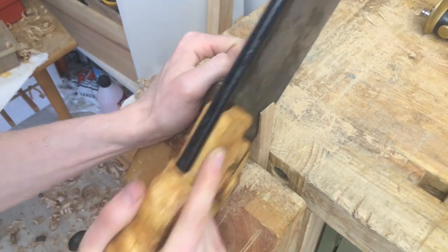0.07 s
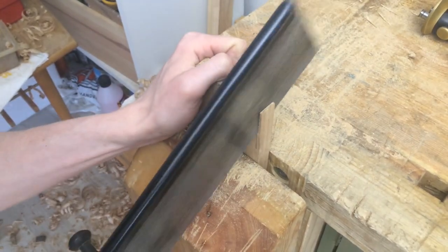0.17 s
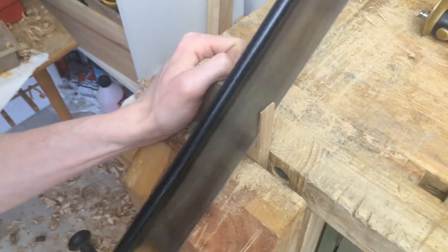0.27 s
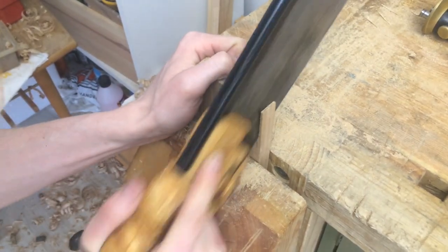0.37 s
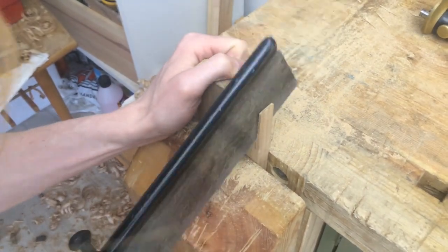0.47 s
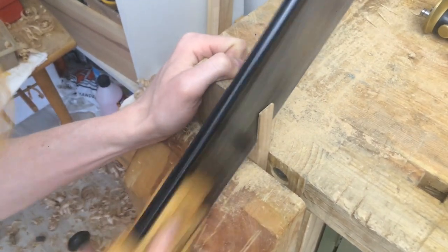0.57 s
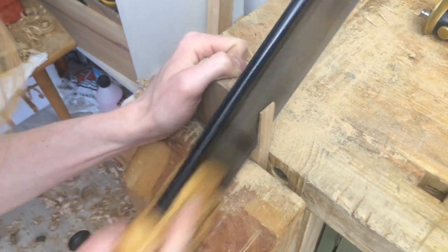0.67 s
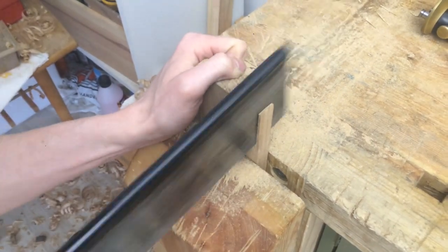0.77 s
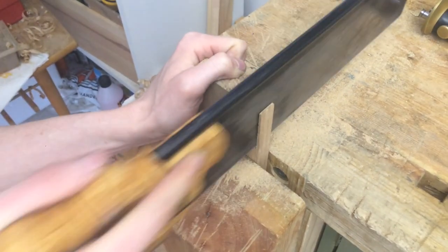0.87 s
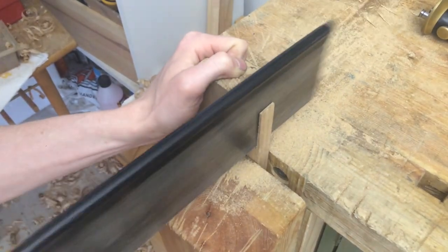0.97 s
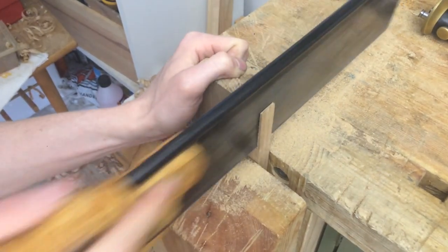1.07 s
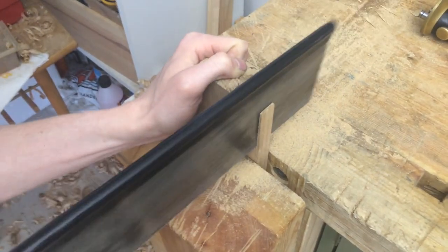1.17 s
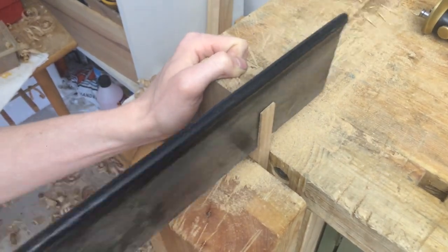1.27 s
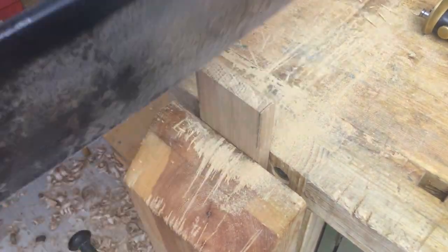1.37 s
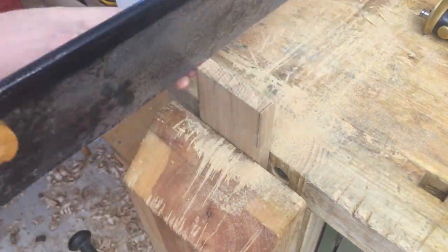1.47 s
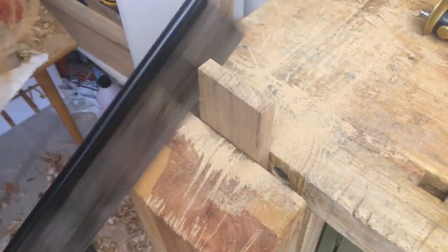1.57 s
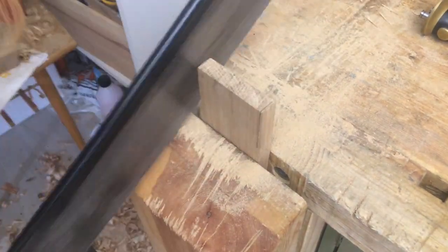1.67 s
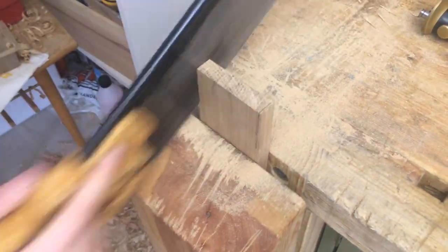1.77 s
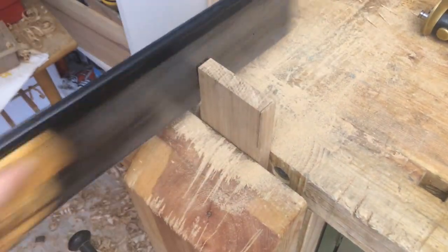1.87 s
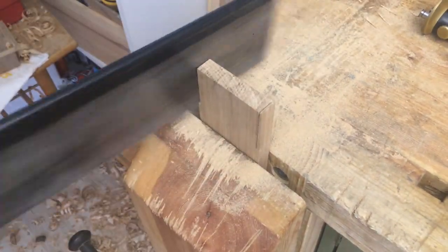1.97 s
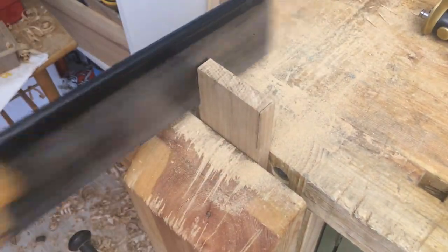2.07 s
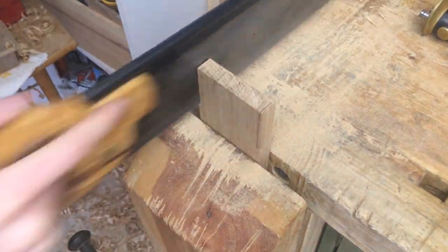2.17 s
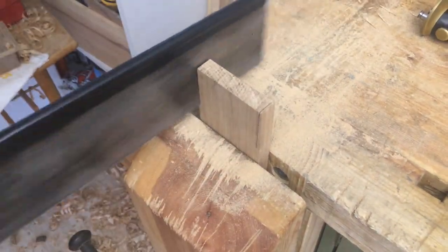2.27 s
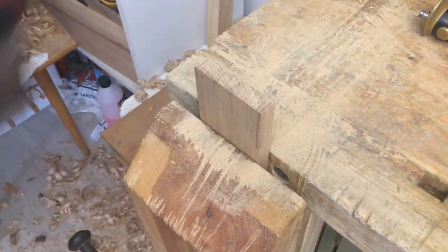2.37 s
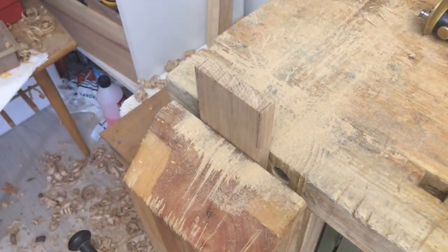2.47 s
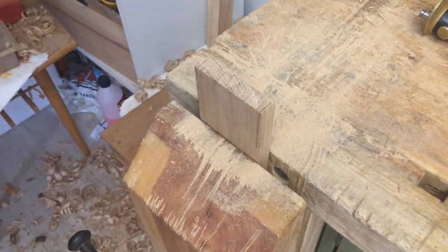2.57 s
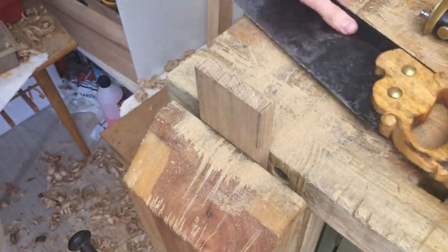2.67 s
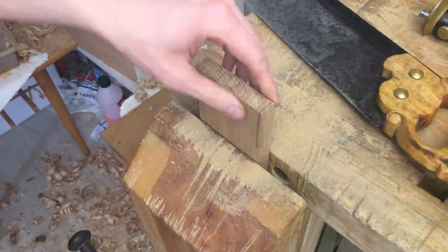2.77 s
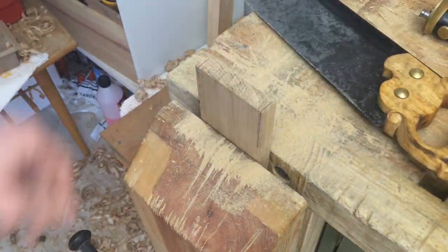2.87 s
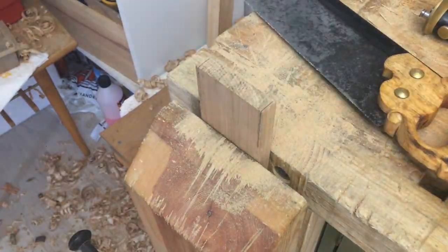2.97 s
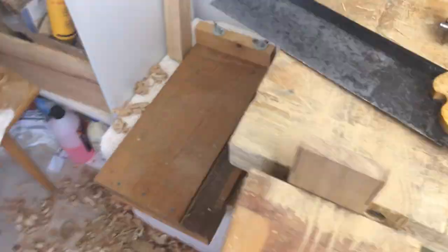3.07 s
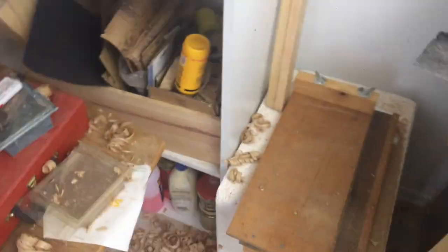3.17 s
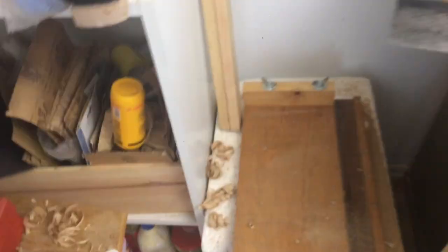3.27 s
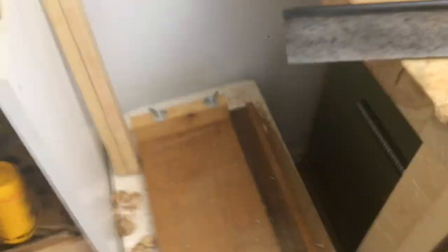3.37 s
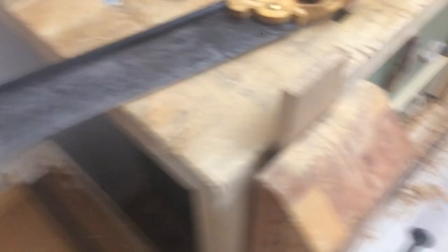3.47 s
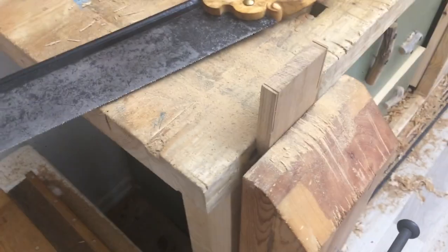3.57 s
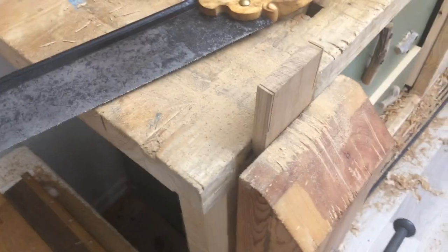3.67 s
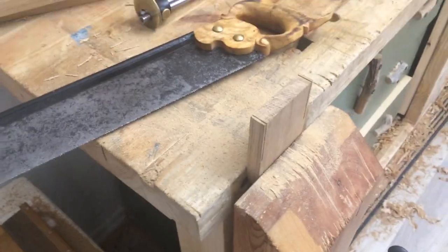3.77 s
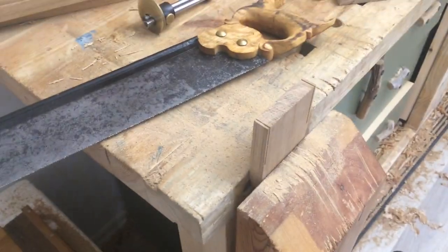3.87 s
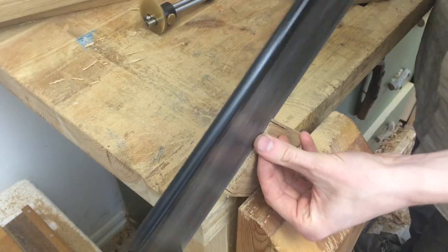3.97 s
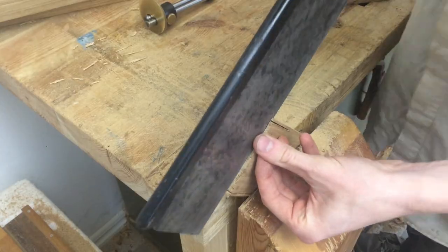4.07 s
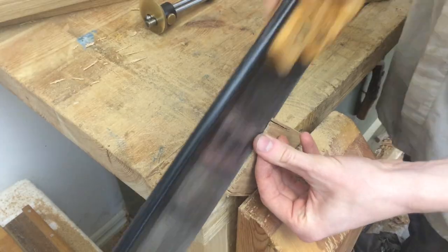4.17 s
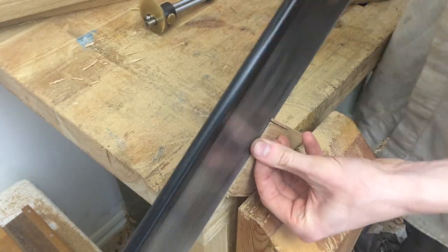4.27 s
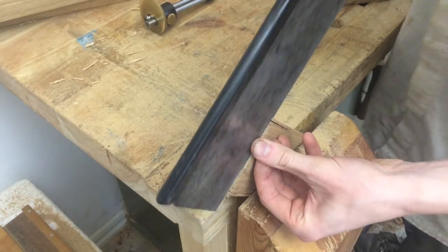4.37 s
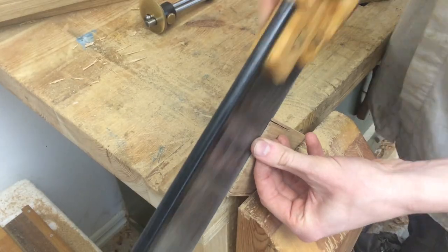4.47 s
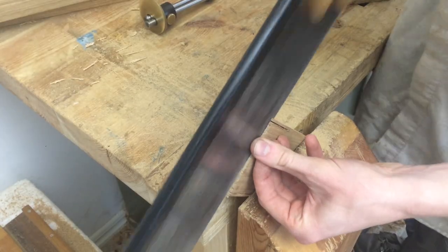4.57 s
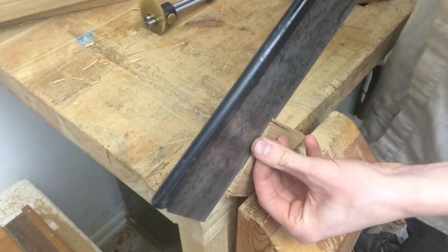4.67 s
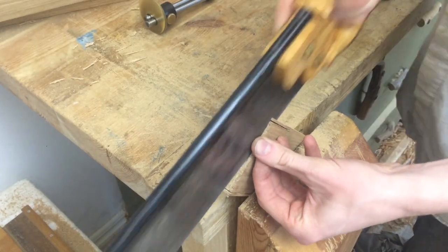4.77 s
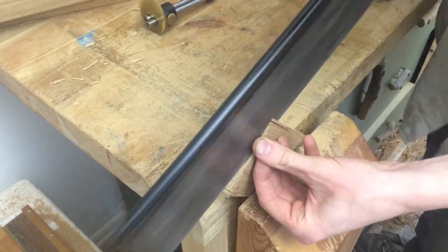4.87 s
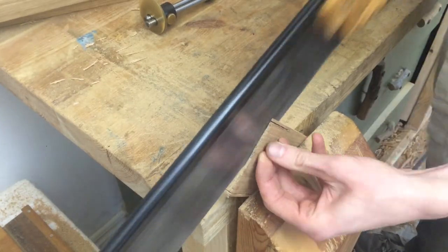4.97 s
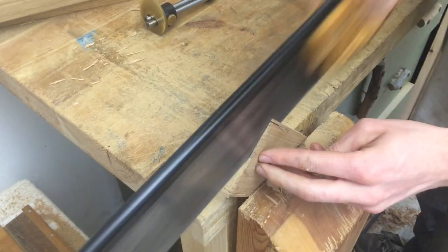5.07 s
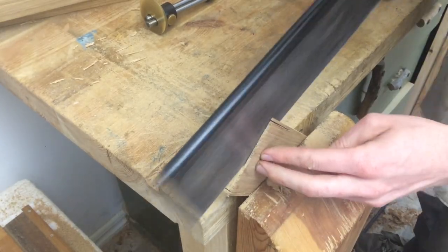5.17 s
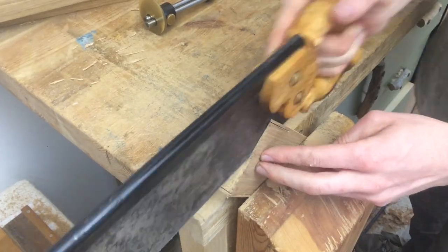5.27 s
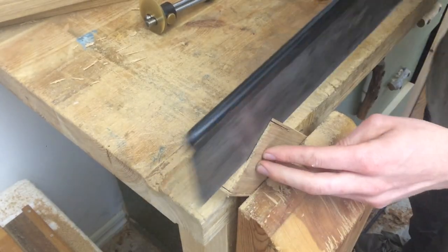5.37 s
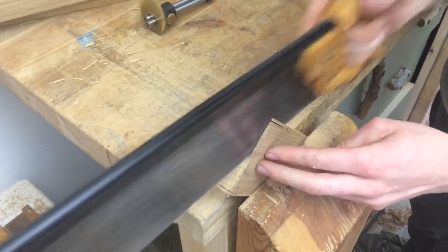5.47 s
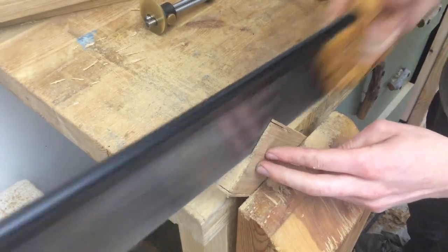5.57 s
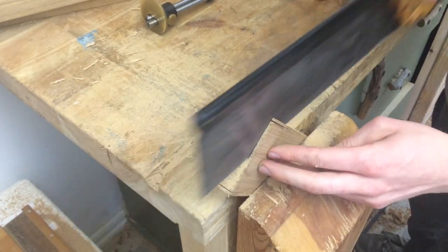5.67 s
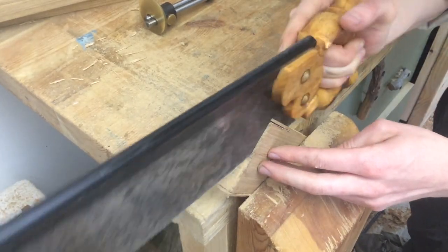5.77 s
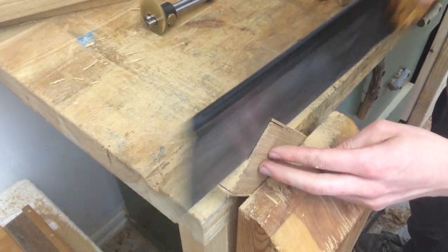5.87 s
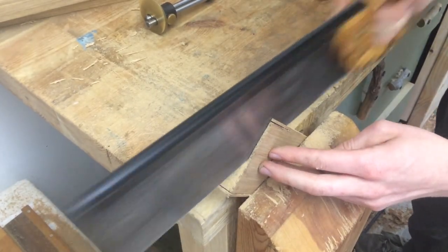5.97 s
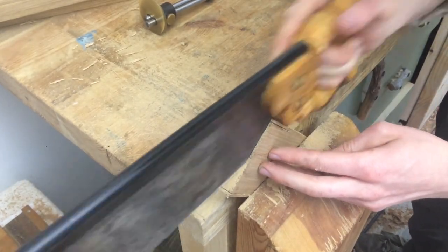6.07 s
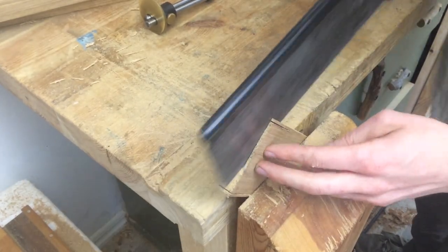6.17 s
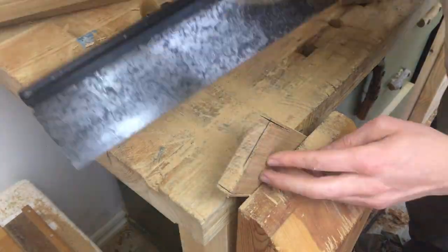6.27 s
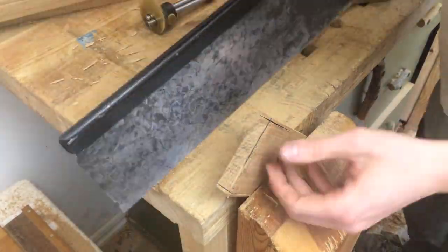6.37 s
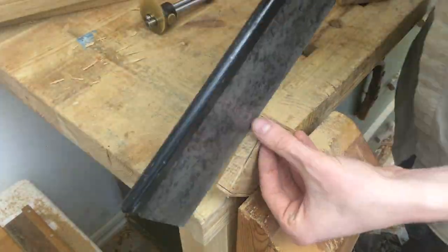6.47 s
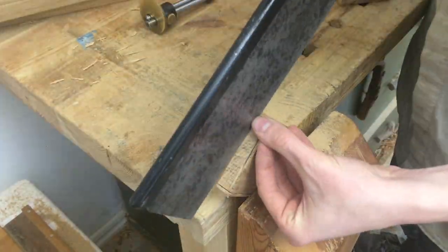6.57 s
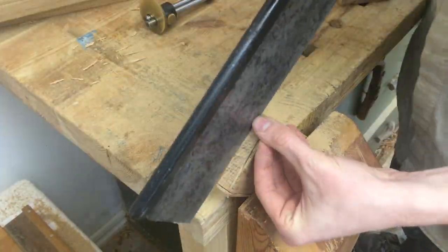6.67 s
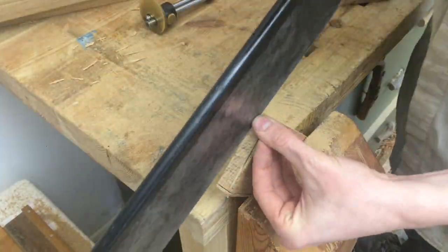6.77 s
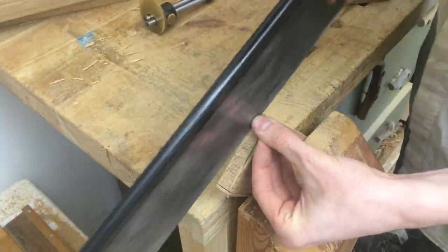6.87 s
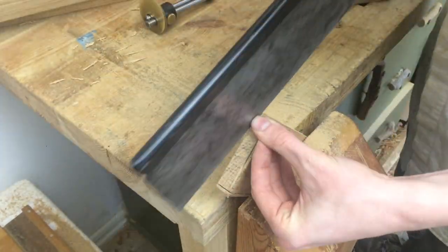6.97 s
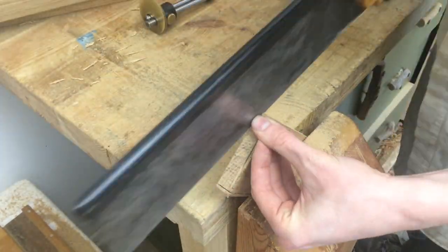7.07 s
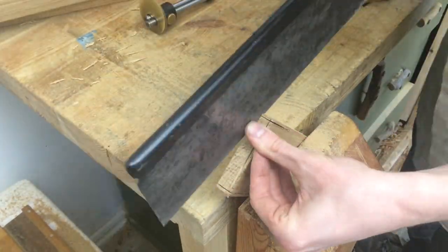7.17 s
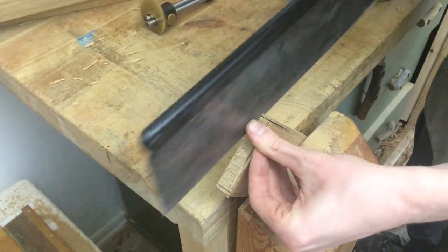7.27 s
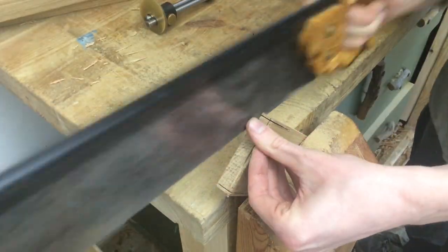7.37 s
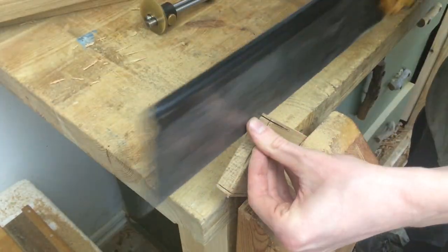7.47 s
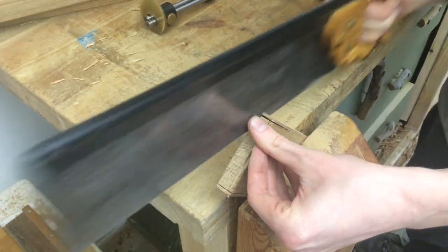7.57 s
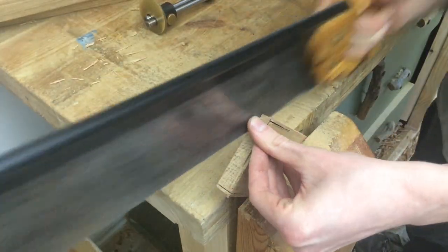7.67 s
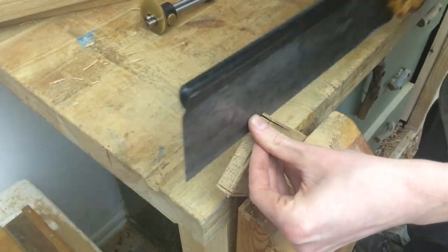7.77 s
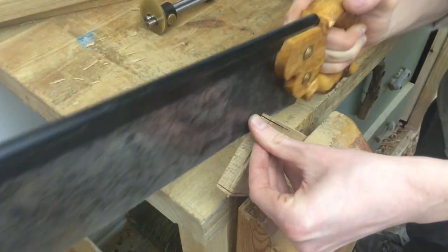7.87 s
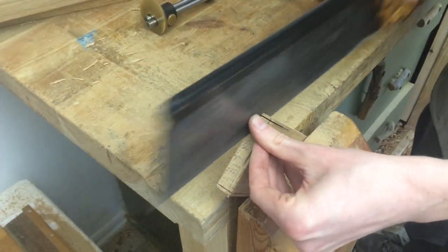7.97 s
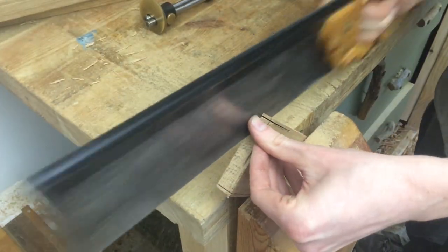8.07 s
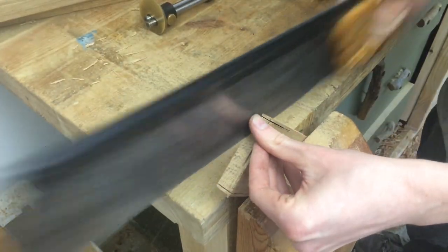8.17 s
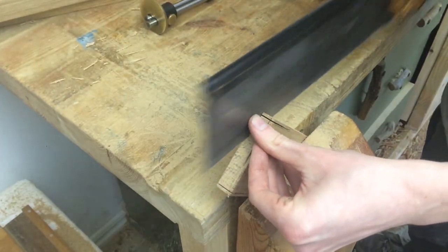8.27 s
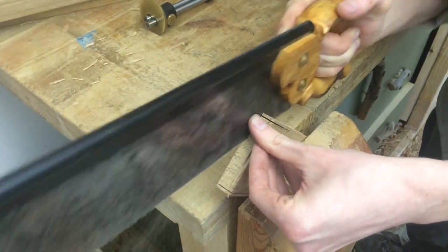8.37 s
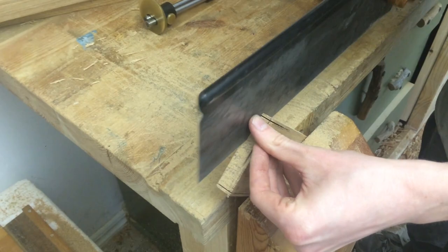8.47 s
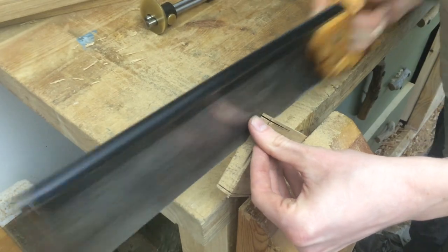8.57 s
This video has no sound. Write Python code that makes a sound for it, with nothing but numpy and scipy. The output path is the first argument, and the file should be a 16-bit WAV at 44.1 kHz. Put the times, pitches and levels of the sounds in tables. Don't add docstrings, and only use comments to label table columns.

```python
import sys
import numpy as np
from scipy import signal
from scipy.fft import rfft, irfft
from scipy.io import wavfile
from scipy.ndimage import uniform_filter1d

SR = 44100
rng = np.random.default_rng(int(sys.argv[2]) if len(sys.argv) > 2 else 0)


def voltage_ratio(level):
    return 10 ** (np.asarray(level, float) / 20)


def file_out(sig):
    cols = np.atleast_2d(sig).T
    lim = np.clip(cols, -1, 1)
    pcm = np.round(lim * 32767).astype(np.int16)
    wavfile.write(sys.argv[1], SR, pcm)


N = 381024
SECOND_KERF_S, RECLAMP_S = 1.45, 3.6
PULL_LAG_S, TEETH_SPREAD = .002, 0.03
BUMP_RISE_SHARE = 0.069
REST_DB, BENCH_UNDER_SLIDE_DB = -89, -2.5
SQUEAK_S = 0.014
HUM_DB = -60

# (time [s], push peak [dB], pull peak [dB], push teeth [Hz], pull teeth [Hz])
KERF_1 = [(-0.022, -24, -16.5, 6280, 8770), (0.197, -23, -28, 5820, 9830),
          (0.684, -23.5, -17.5, 5900, 9560), (0.741, -18.5, -27.5, 5310, 3900),
          (0.928, -19.5, -22, 4130, 3900), (1.06, -20, -34, 4400, 3840), (1.129, -17, -29, 4200, 3800),
          (1.207, -19.5, -44, 4300, 3900), (1.253, -22.5, -38.5, 4300, 3800)]
KERF_2 = [(1.539, -15.5, -15.5, 7060, 5000), (1.598, -23, -28, 6500, 4400),
          (1.65, -21.5, -28.5, 6220, 4200), (1.763, -24.5, -29.5, 6000, 4300),
          (1.824, -23, -20.5, 5420, 4650), (1.948, -17, -30, 4986, 4350), (2.018, -18.5, -30.5, 4350, 4400),
          (2.228, -19, -29, 4400, 4140), (2.296, -21, -29.5, 4400, 3580)]
KERF_3 = [(3.986, -27, -26.5, 6900, 7100), (4.375, -27.5, -23, 7030, 6800),
          (4.412, -27.5, -24.5, 7080, 6700), (4.61, -23.5, -23, 7266, 7560),
          (4.736, -27, -25.5, 7070, 7300), (5.088, -25, -24.5, 7300, 7100),
          (5.837, -21.5, -28.5, 7470, 7870), (6.107, -25, -22.5, 7700, 7500),
          (6.175, -23.5, -27, 8070, 6300)]
KERF_4 = [(7.228, -31, -36.5, 7100, 6700), (7.369, -27.5, -24.5, 7120, 7150),
          (7.529, -25.5, -24.5, 7900, 7240), (7.807, -27.5, -24, 7500, 7780),
          (7.966, -26.5, -24, 7200, 7040), (8.064, -27, -29.5, 6990, 7200), (8.125, -26, -25, 7750, 7290),
          (8.376, -26, -27.5, 7530, 6970), (8.628, -25, -22.5, 7640, 6330)]
COUNTS = [
    [-1, 6, 22, 24, 30, 34, 36, 38, 39],
    [0, 2, 4, 8, 10, 14, 16, 22, 24],
    [0, 13, 14, 21, 25, 36, 60, 69, 71],
    [0, 4, 9, 18, 23, 26, 28, 36, 44],
]
# (both strokes late [ms], push [dB], pull [dB], push whistle [dB],
# pull whistle [dB])
PAIRS_1 = [(0.75, 0.0, -5.5, 0.0, -6.5), (2.0, 2.5, -5.5, -3, 7.5), (-2.0, 1.5, -1.5, 4, -7),
           (0.5, 2, 0.5, -1.5, 6.5), (0.0, 0.5, 3, 5, 1), (-1.0, 1, -0.5, 4.5, 10), (-1.5, 2, -1.5, -1, 8),
           (0.16, 0.5, -2, 3.5, 6.5), (-0.5, 1.5, 0, 3.5, 5.5), (1.5, 1, -3.5, 2, 3),
           (1.44, -1.5, -4, 2.5, 5.5), (0.5, -0.5, -6, 3, -3.5), (-1.4, 0.5, -1.5, 3, -9),
           (2.0, -2, 0, 4.5, 6.0), (1.65, -3.5, 1.5, 6, -6.5), (-0.5, -3.5, -2, 6, -0.5),
           (1.5, -1, -3.5, -11, -5.5), (0.5, 0, -0.5, -15, -5.5), (1.07, -1.5, 1, -12.0, -4.5),
           (-0.5, -3.5, 1, 3, -7.0), (4, -0.5, 1, -9.0, -8.0)]
PAIRS_2 = [(1.0, -1.5, 2, 0, 4), (0.0, -1, 2, 7, -6), (3.0, 1.5, 3, 4, -8), (-1.1, 0.5, 0.5, 2.5, 0.5),
           (1.4, 3, -1.5, 2, -12.0), (2, 4.5, -2, 0.5, -2), (1.5, 1, 1.5, 0.5, -3), (1.0, -1, 5, -0.5, 8),
           (0.5, -2.5, 3.5, 1.5, 14), (-0.9, 0, 4.5, 5, 2), (1.5, 0.5, 0, -10.5, 1),
           (-0.17, 1, 1.0, 1, -1.5), (2, 0.5, 0.0, 9, 0.0)]
PAIRS_3 = [(2.5, -0.5, 1, -14, -9), (-0.5, 0, 1, -2, 0), (1, 2.5, 0, -14, -2.0),
           (3, 1.6, -0.5, -11.5, -2.0), (2.5, 2, -3, -7, -2), (1, 0.3, -2.5, -14, -15),
           (-0.5, 1.5, -3.5, -14, 5), (-3, -1.5, 1, -6.5, -3), (-0.5, 2, 0.5, 4, 9.5),
           (3.5, -1.4, -3, 3.5, 7.5), (5.5, -1.8, -2, -3, -2), (0.5, -3, -1.5, -8, 8.5),
           (-0.5, 1, -0.5, -11, 5), (-1.5, 2.5, -2.5, -13, -3), (3, 1.5, -3.5, -10, -8),
           (1.5, 1.5, -1.5, -16, 5), (-4, 0.5, -0.5, -2.5, 5.5), (-4, -0.8, -0.5, -14, 3),
           (-2.5, 1.1, 0, 1, 1.5), (-0.5, 1.5, -0.5, -7.5, 2), (0.5, 0.7, 1, 3, 4),
           (-2.5, 1, -0.5, -1.5, 3), (0.5, -1, 0.5, -1, 3.5), (2, -1, -2.5, 1, 6), (-1.5, -1.3, 2.5, -1, 6),
           (-1, -3.5, 1.5, -1, 7.5), (-1.5, -0.5, 4.5, -0.5, -1.0), (-3.5, -3, 0.5, 3, 13),
           (-2, 1, 7.5, -1, 8), (0.5, -3.5, 2, 2, 5.5), (-1.5, -1.9, 3.0, 3.5, 7.5), (2.5, -2, 1, 1.5, 4),
           (1, -1.5, -1, -2.5, 6.5), (2.5, -0.5, -1.5, -4, 6.5), (1, 1.6, -1, 0, 1), (3.5, -0.5, 3, 4.5, 3)]
PAIRS_4 = [(1, 1.5, 2, -5.5, 5), (0.5, 3.5, 0.5, -1, 3), (-3, -1, 0.5, 5, -1), (-1.5, 0.5, -0.5, 0, 2.5),
           (-3.5, 0, -2.5, -4, -5.0), (1, -0.5, -0.5, -4.0, 6.5), (-0.5, 0, -2, -2.5, 8),
           (1.5, 1.5, -3, -2, 1.5), (1.5, 1.5, -3.5, -2, 3), (-0.5, 1.5, -4, 0, 3.5), (6, -1.5, -4.5, 8, 6),
           (0, -1.5, -2, 9.5, 6), (-1, -0.5, 2, 8, 0.0), (-2.5, 1, 0, 2, 2), (0, 0.5, -1, 3.5, 6.5),
           (0, 0.5, -2.5, 7.5, 8), (-1, 1, 0.5, 2, 4), (3.5, 0, 3, 3.5, -1.0), (-0.5, 0.5, 2, 3.5, 0),
           (-3.5, 0.5, -2, 1.5, 1), (1, 1.0, -4, -2.5, -8), (-3, 0.5, -3, 0.5, -6.5),
           (-3, -3, 0.0, -12.0, 0.0)]
# (bench [dB], board at 5000 Hz teeth [dB], edge hiss on entry [dB], edge hiss at depth [dB])
KERF_COLOUR = [(-10, -4.5, 5.5, 0.5), (-9.5, -3, 4.5, 2.5), (-8.5, 0, 5.5, 4.5), (-7.5, 0.5, 2.5, 4.5)]
# (first clamping [dB/kHz], second [dB/kHz])
BOARD_DB_PER_KHZ = (-2, -1.5)
PEAK_SHARES = [(.52, .42), (.56, .33)]
# (frequency [Hz], width [Hz], level [dB])
FIRST_CLAMP = [(580, 80, 16), (850, 80, 3), (1330, 70, 8), (1580, 60, 4), (1820, 90, 7), (2880, 80, 4),
               (3900, 180, 6.5), (4420, 130, 6), (5450, 200, 4), (7280, 150, 3), (11000, 300, 3),
               (1170, 60, 6), (2250, 90, 5), (6100, 150, 4)]
SECOND_CLAMP = [(573, 70, 17), (840, 50, 15), (1570, 60, 3), (2385, 70, 10), (3250, 150, 4), (4050, 120, 6),
                (4470, 90, 5), (6430, 140, 5), (10600, 400, 5), (14200, 700, 5), (15700, 300, 4),
                (4950, 250, 3), (2610, 70, 4), (3720, 120, 4)]
# (time [s], peak [dB], wood [dB], edge hiss [dB])
BUMPS = [(2.332, -25, -3, 8.5), (2.674, -50, 10, -3), (2.885, -50, 0, 10), (3.092, -43, 1, 10),
         (3.109, -32, 4.5, 10.5), (3.2, -50, -14, 4), (3.266, -43, 18, 5), (3.335, -40, 6.5, 1),
         (3.396, -42, 5, -1), (3.354, -45.5, 8, 7), (3.409, -41.5, 7, 0), (3.43, -33, 1, -6),
         (3.471, -45, 7, -2), (3.489, -48.5, 14.5, 8), (3.7, -61, 14.5, -14), (3.942, -44, -2, 0),
         (6.255, -52, 2, 9), (6.872, -27.5, -7, 6), (6.348, -51, -16, 4), (6.657, -49, 3, 6),
         (6.714, -24.5, 0, 5), (6.76, -73, 7.5, -2), (6.815, -51, -10, -2), (6.842, -38, -10, 0.5),
         (7.132, -34.5, -3, -0.5), (7.213, -25, -3, 11.5)]
# (time [s], peak [dB], wood [dB], edge hiss [dB], part before the peak [share])
DRAWS = [(1.323, -27, -12, 11, 0.1), (1.343, -50, 1, 9, 0.5), (1.39, -40, 4, 16, .95),
         (1.421, -33, -4, 17, 0.72), (1.46, -56.5, 6, 0, .7), (1.508, -23.5, 0.5, 7.5, 0.47),
         (2.845, -55.5, -5, 9, .7), (3.138, -37, -21, 13, 0.68), (3.272, -31.5, 2, 8.5, .35),
         (3.308, -41, 4.5, -6, 0.38), (3.656, -54, -14, -19, 0.43), (3.855, -46, 1.5, 9, .5),
         (3.963, -32, -5, 0, .9), (6.298, -29, -5, 12.5, 0.28), (6.884, -24, -5.5, 2.5, .6),
         (6.939, -28, -18, 0, 0.41), (6.991, -36, -18, -2, 0.79), (7.014, -20.5, -7.5, 6.5, 0.45),
         (7.067, -30, -9, -2, 0.93)]
RESTS = [2.363, 2.709, 2.915, 3.192, 3.23, 3.304, 3.448, 3.53, 3.674, 3.745, 3.885, 3.958, 6.224, 6.38,
         6.685, 6.8, 6.929, 7.117, 7.168]
# (time [s], peak [dB])
SNAPS = [(1.562, -15), (2.72, -40), (5.613, -20), (2.165, -21), (4.07, -23), (4.189, -32), (6.819, -48),
         (6.831, -45), (6.941, -23), (6.946, -23), (6.948, -32), (6.96, -18), (6.967, -17), (6.975, -16),
         (6.981, -17), (7.078, -20), (7.085, -21), (7.1075, -13), (7.266, -19), (7.276, -19), (7.661, -21),
         (6.401, -55), (3.703, -52), (3.019, -56), (3.04, -57), (2.82, -58), (3.027, -58), (5.6, -21),
         (4.307, -29)]
# (time [s], level [dB])
BLADE_RINGS = [
    (1.325, -29.5),
    (2.338, -36),
    (6.817, -58),
]
# (frequency [Hz], level [dB])
BLADE_MODES = [(3930, 0.5), (5190, -6), (6790, 3), (8210, 3), (9660, 2), (11230, 3), (12560, -2)]
# (time [s], level [dB]), and the pitch of each squeak [Hz]
SQUEAKS = [
    (2.851, -60),
    (2.862, -62),
    (2.872, -67),
    (3.659, -59.5),
]
SQUEAK_HZ = [4350, 4300, 4400, 5500]
# (time [s], peak [dB], main pitch [Hz], t60 [s])
KNOCKS = [(1.48, -40.5, 5200, 0.041), (1.509, -23, 7000, .02), (2.683, -27.5, 4170, 0.024),
          (2.7215, -29, 14000, 0.014), (2.7205, -35, 2400, .05), (2.731, -9.5, 4420, 0.027),
          (2.730, -21, 8000, .02), (2.730, -21, 2850, .03), (2.676, -38, 720, .06),
          (3.449, -27, 5500, .012), (2.925, -48, 700, 0.023), (2.968, -45, 705, 0.049),
          (3.028, -48, 3020, .02), (3.112, -27, 3700, 0.012), (3.267, -18, 1430, 0.041),
          (3.267, -24.5, 5360, .03), (3.310, -25, 860, 0.07), (3.312, -35, 5700, .06),
          (3.359, -36, 5500, .02), (3.422, -25.5, 940, 0.063), (3.463, -34, 5500, .015),
          (3.505, -35, 5000, 0.013), (3.473, -36, 1100, .04), (3.943, -35.5, 1190, .03),
          (6.502, -49, 2980, 0.075), (6.773, -40, 4000, .02), (6.709, -33.5, 8950, .02),
          (6.717, -30, 2080, 0.055), (6.755, -44, 3800, .03), (6.502, -54, 9000, .05),
          (7.213, -44, 6000, .02), (3.407, -37, 5500, .012), (3.411, -31, 1500, .02),
          (3.4235, -30, 5700, .015), (3.453, -40, 1500, .02), (3.458, -41, 5500, .01),
          (3.497, -37, 4500, .012), (3.463, -41, 10000, .01), (3.504, -42, 10000, .01),
          (3.449, -37, 10000, .01), (3.136, -42, 2600, .02), (5.735, -20, 3000, .025),
          (3.916, -52, 9000, .05)]
# (frequency [Hz], density [dB per Hz])
HUM = [(40, -33), (150, -32.5), (350, -9.5), (480, -12), (580, 6.5), (700, -7), (1100, -3.5), (1800, -16),
       (2400, -12.5), (3000, -20), (16000, -31)]


def saw():
    start, peak_db, share, tooth_hz, push, whistle_db, *colour = movements()
    row, past_peak, speed = strokes(start, share)
    push, tooth_hz, whistle_db = push[row], tooth_hz[row], whistle_db[row]
    bench_db, board_db, edge_db = uniform_filter1d(np.array(colour)[:, row], size=200, axis=1)
    cutting = tooth_hz > 0
    pulled, spent = cutting * (1 - push), push * past_peak.clip(0)
    first = np.arange(N) < SECOND_KERF_S * SR

    rising = past_peak < 0
    dip_db = by_clamp(14.4, 16.3) * np.where(cutting, 1, 0.65)
    into_push = cutting * (rising == push)
    deep_dip_db = dip_db - by_clamp(11.5, 10.8) * into_push
    bend = np.where(cutting, 0.45, 1.05)
    blade_share = 1 / np.sqrt(1 + voltage_ratio(2 * edge_db))
    sharp = blade_share * voltage_ratio(pressure_db(peak_db, row, rising, speed, dip_db, bend))
    deep = blade_share * voltage_ratio(pressure_db(peak_db, row, rising, speed, deep_dip_db, bend))
    lasting = np.sqrt(signal.lfilter([.003], [1, -.997], deep ** 2))
    mean = np.sqrt(uniform_filter1d(deep ** 2, size=2600).clip(0))

    unevenness = voltage_ratio(2.5 * np.minimum(rng.exponential(1, N), 5) + 1.1 * drift(150.0))
    rub, scuff = grit(unevenness, patchy_db=5.0), grit(unevenness, patchy_db=4.5)

    octave = np.where(first, .25, np.clip(tooth_hz / 1000 - 4.7, .15, .9))
    whistle = voltage_ratio(by_clamp(-0.88, 0.96) + 5.66 * push + whistle_db)
    whistle = whistle * teeth(tooth_hz, past_peak, push, octave)

    brisk = push * np.clip(tooth_hz / 1500 - 2.6, .15, 1)
    bite = voltage_ratio(by_clamp(np.where(first, 5.5, 1.5), -7)) * (brisk * speed ** 3 + 0.27 * pulled)
    bite = bite * rms_one(np.where(first, band(scuff, 7970, 10870), band(scuff, 7360, 10230)))

    chatter_db = by_clamp(-9 + push * 1.5 * np.minimum(board_db + 1, 0), -3.5 - 3.5 * push)
    chatter = voltage_ratio(chatter_db) * groan(row, push, past_peak) * cutting

    upper_db = by_clamp(-4.5, -5.0) - by_clamp(13.0, 0.78) * pulled + 4.0 * (brisk - push)
    upper = voltage_ratio(upper_db) * rms_one(band(rub, 5200, 8470))
    middle = voltage_ratio(by_clamp(-5.0, -6.0) + 3.86 * push * speed ** 4) * rms_one(band(scuff, 2884, 5050))
    blade = sharp * (upper + whistle + bite) + deep * (middle + chatter)

    hiss_db = edge_db + 15.5 + by_clamp(4.5, 5.0) * push - 8.0 * spent - 6.91 * (4.0 - speed)
    edge = sharp * voltage_ratio(hiss_db) * rms_one(band(scuff, 9470, 15300))

    board_db = board_db - 5.0 - by_clamp(9.0, -6.5) * push * past_peak - by_clamp(3.7, -2.1) * brisk * speed
    board = lasting ** .3 * deep ** 0.71 * voltage_ratio(board_db) * rms_one(band(rub, 955, 2270))

    evened = np.sqrt(lasting * np.minimum(mean, 0.82 * lasting)) * voltage_ratio(bench_db)
    low = band(band(rub, 140, 480, order=1), 300, 600, order=1)
    bench = voltage_ratio(-4.0) * rms_one(band(scuff, 432, 1100)) + voltage_ratio(-10.0) * rms_one(low)
    rumble = voltage_ratio(-38.5) * lasting * rms_one(band(scuff, 24, 130, order=1))
    return blade + edge + board + evened * bench + rumble


def cuts():
    rows = []
    kerfs = (KERF_1, KERF_2, KERF_3, KERF_4)
    all_pairs = (PAIRS_1, PAIRS_2, PAIRS_3, PAIRS_4)
    for kerf, pairs, counts, colour in zip(kerfs, all_pairs, COUNTS, KERF_COLOUR):
        bench_db, board_db, entry_db, depth_db = colour
        n = np.arange(counts[0], counts[-1] + 1)
        s, push_db, pull_db, push_hz, pull_hz = [np.interp(n, counts, c) for c in np.transpose(kerf)]
        push, later = n % 2 == 0, int(s[0] > RECLAMP_S)
        late_ms, more_push, more_pull, *whistle_db = np.array(pairs)[n // 2 - n[0] // 2].T
        start = s + PULL_LAG_S * ~push + late_ms / 1000
        peak_db = np.where(push, push_db + more_push, pull_db + more_pull)
        share = np.where(push, *PEAK_SHARES[later])
        hz = np.where(push, push_hz, pull_hz) * (1 + TEETH_SPREAD * rng.standard_normal(len(n)))
        board = board_db + BOARD_DB_PER_KHZ[later] * (push_hz - 5000) / 1000
        edge = np.linspace(entry_db, depth_db, len(n))
        rows += zip(start, peak_db, share, hz, push, np.where(push, *whistle_db),
                    bench_db + 0 * s, board, edge)
    return rows


def movements():
    rows = cuts()
    for s, db, wood, edge, share in [(*bump, BUMP_RISE_SHARE) for bump in BUMPS] + DRAWS:
        rows.append((s, db, share, 0, 0, 0, wood + BENCH_UNDER_SLIDE_DB, wood, edge))
    for rest in RESTS:
        colour = max(r for r in rows if r[0] < rest)[-3:]
        rows.append((rest, REST_DB, .5, 0, 0, 0, *colour))
    return np.transpose(sorted(rows))


def strokes(s, share):
    t = np.arange(N) / SR
    ends = np.append(s[1:], s[-1] + 0.022)
    row = np.clip(np.searchsorted(s, t, "right") - 1, 0, None)
    along = (t - s[row]) / (ends - s)[row]
    top = np.clip(share, .03, .97)[row]
    reach = np.where(along < top, along / top, (1 - along) / (1 - top))
    return row, along - top, np.sin(np.pi / 2 * np.clip(reach, 0, 1))


def pressure_db(peak, row, rising, speed, dip_db, bend):
    turn = np.minimum(peak, np.append(peak[0], peak[:-1]))
    base = np.where(rising, turn[row], np.append(turn[1:], turn[-1])[row]) - dip_db
    base = np.maximum(base, peak[row] - 28.0)
    return base + (peak[row] - base) * speed ** bend


def grit(unevenness, patchy_db):
    tear, shake = rng.standard_normal((2, N)) * unevenness
    knots = np.arange(0, N + 700, 700)
    spans = np.split(np.arange(N), [round(RECLAMP_S * SR)])
    rung = []
    for clamp, at in zip((FIRST_CLAMP, SECOND_CLAMP), spans):
        board = np.zeros(len(at))
        for k, (hz, width, db) in enumerate(clamp):
            patches = np.interp(at, knots, rng.standard_normal(len(knots)))
            fed = shake[at] * voltage_ratio(db + patchy_db * patches)
            board += (-1) ** k * resonance(fed, hz, width)
        rung.append(board)
    return .9 * tear + np.concatenate(rung)


def teeth(top_hz, past_peak, push, octave):
    past = past_peak + by_clamp(.02, 0.19 * push - 0.09)
    glide = 1 + by_clamp(.6 * octave - .35, 3.0 * push - 0.8) * past
    rate = top_hz * glide * (1 + by_clamp(.06, .065) * drift(500.0))
    turns = 2 * np.pi * np.cumsum(rate) / SR
    tone = np.sin(turns) + by_clamp(octave, .25) * voltage_ratio(3.0 * drift(100.0)) * np.sin(2 * turns)
    burst = np.exp(-(past / by_clamp(0.057 + 0.15 * push, 0.055 - 0.0092 * push)) ** 2)
    return tone * voltage_ratio(3.65 * drift(450.0)) * burst * np.clip(top_hz / 1500 - 2.6, 0, 1)


def groan(row, push, past_peak):
    chance = rng.standard_normal((row.max() + 1, 3))[row].T
    hz = np.where(push, by_clamp(1500, 3300), by_clamp(4050, 2500))
    hz = hz * (1 + by_clamp(.06, .03 + .06 * push) * chance[0] + .02 * drift(500.0))
    past = past_peak - by_clamp(.08, .16 - .1 * push) - by_clamp(.15, .07) * chance[1]
    tone = np.sin(2 * np.pi * np.cumsum(hz * (1 + .5 * np.abs(past))) / SR)
    level = voltage_ratio(by_clamp(4.0, 2.0) * chance[2] + 3.5 * drift(250.0))
    return tone * level * np.exp(-(past / .14) ** 2)


def snaps():
    clicks = np.full(N, 1e-18)
    for s, db in SNAPS:
        clicks[round(s * SR)] = voltage_ratio(db) * rng.choice([-1, 1])
    return 4.6 * band(clicks, 1500, 12000, order=1) + 7.0 * resonance(clicks, 760, 740)


def blade_rings():
    flicks = np.full(N, 1e-18)
    for s, db in BLADE_RINGS:
        flicks[round(s * SR):][:400] = voltage_ratio(db) * rng.standard_normal(400)
    return sum(voltage_ratio(db) * resonance(flicks, hz, 84.0) for hz, db in BLADE_MODES) * 4.4


def squeaks():
    out, size = np.zeros(N), round(SQUEAK_S * SR)
    for (s, db), hz in zip(SQUEAKS, SQUEAK_HZ):
        rub = np.append(rng.standard_normal(800)[:size] * np.hanning(size), np.zeros(900))
        tone = resonance(rub, hz, 200.0) + .5 * resonance(rub, 0.75 * hz, 254.0)
        out[round(s * SR):][:len(rub)] += voltage_ratio(db) * rms_one(band(tone, hz / 2, 1.3 * hz))
    return out


def knocks():
    out, t = np.zeros(N + 4096), np.arange(4096) / SR
    for s, db, hz, t60 in KNOCKS:
        burst = rng.standard_normal(4096) * voltage_ratio(-60 * t / t60)
        crack = band(burst * voltage_ratio(-30.0 * t / t60), 420, 22000)
        body = band(burst, hz * 0.63, hz * 1.31) + np.clip(0.39 + db / 120, 0, 1) * crack
        out[round(s * SR):][:4096] += voltage_ratio(db) * body / np.abs(body).max()
    return band(out[:N], 380, 19000)


def hum():
    hz = np.arange(N // 2 + 1) * SR / N + 1
    table_hz, table_db = np.transpose(HUM)
    colour = voltage_ratio(np.interp(np.log(hz), np.log(table_hz), table_db))
    noise = rms_one(irfft(rfft(rng.standard_normal(N)) * colour, N))
    return voltage_ratio(HUM_DB + 2.0 * drift(25.0) + 2.0 * drift(5.9)) * noise


def by_clamp(first, second):
    return np.where(np.arange(N) < RECLAMP_S * SR, first, second)


def rms_one(x):
    return x / np.sqrt(np.mean(x ** 2) + 1e-20)


def band(x, low_hz, high_hz, order=2):
    edges = [low_hz, min(high_hz, .45 * SR)]
    return signal.sosfilt(signal.butter(order, edges, "band", fs=SR, output="sos"), x)


def resonance(x, hz, width_hz):
    r = np.exp(-np.pi * width_hz / SR)
    poles = [1, -2 * r * np.cos(2 * np.pi * hz / SR), r * r]
    return signal.lfilter(np.array([1, 0, -1]) * (1 - r * r) / 2, poles, x)


def drift(hz):
    r = np.exp(-2 * np.pi * hz / SR)
    return rms_one(signal.lfilter([1], [1, -2 * r, r * r], rng.standard_normal(N + SR))[SR:])


def scene():
    return (saw() + snaps() + knocks() + blade_rings() + squeaks() + hum())[None]


def low_pass(x):
    return signal.sosfilt(signal.butter(12, 17120, fs=SR, output="sos"), x)


def record(dry):
    rounded = .6 * np.tanh(dry / .6)
    mix = signal.sosfilt(signal.cheby2(20, 60, 16020, fs=SR, output="sos"), rounded)
    return low_pass(mix)


dry = scene()
out = record(dry)
file_out(out)
```